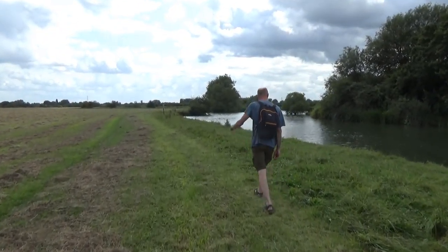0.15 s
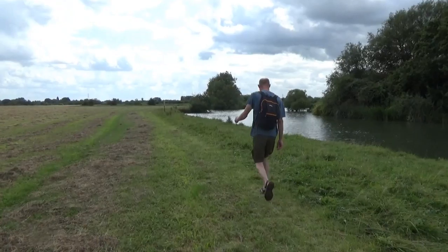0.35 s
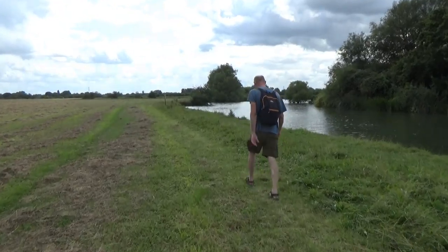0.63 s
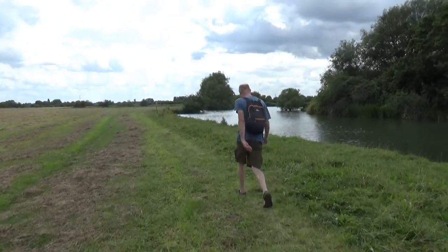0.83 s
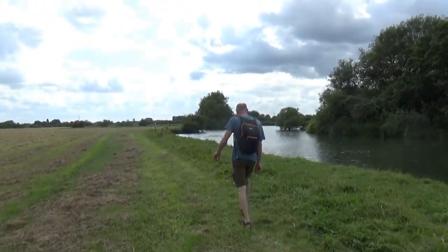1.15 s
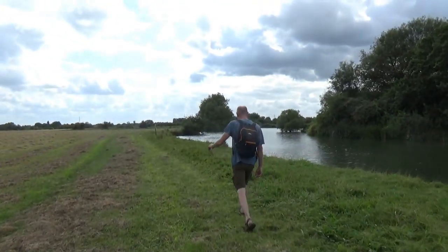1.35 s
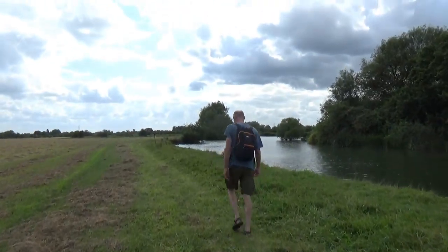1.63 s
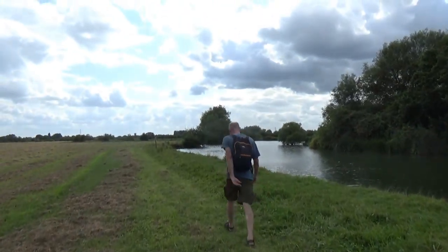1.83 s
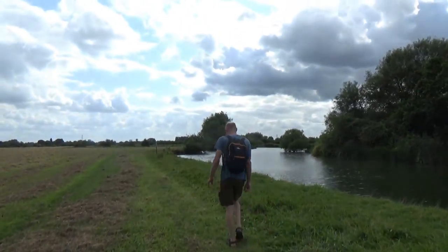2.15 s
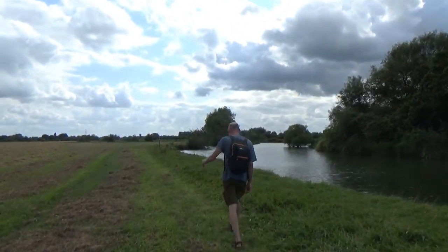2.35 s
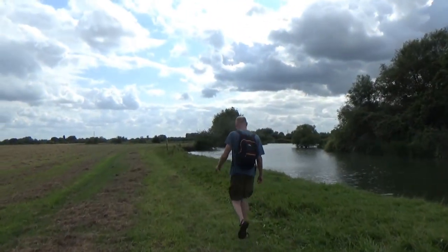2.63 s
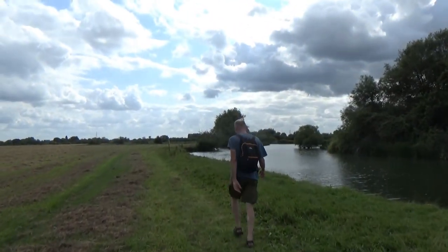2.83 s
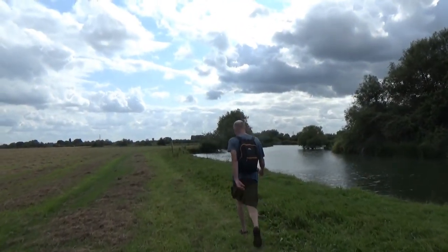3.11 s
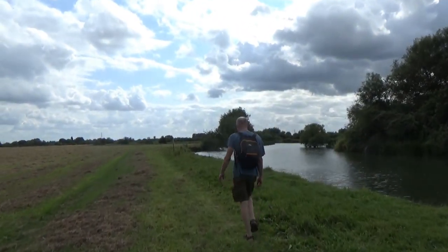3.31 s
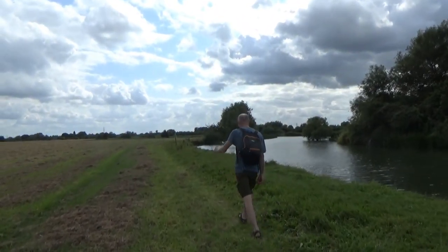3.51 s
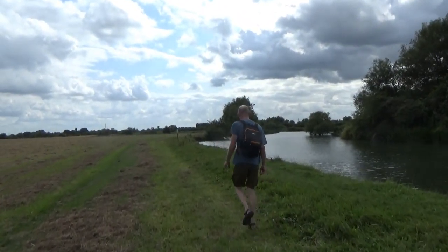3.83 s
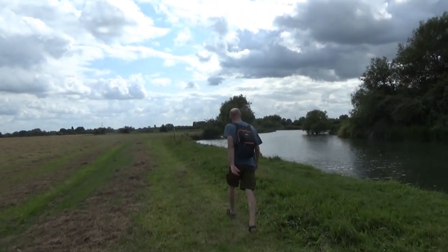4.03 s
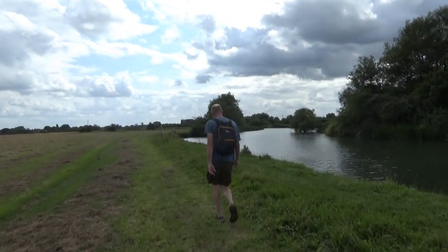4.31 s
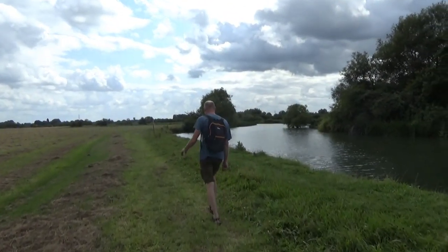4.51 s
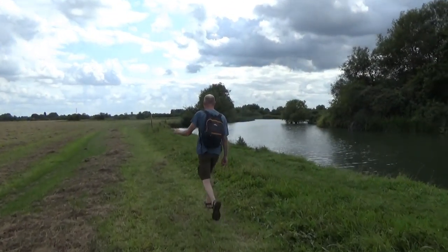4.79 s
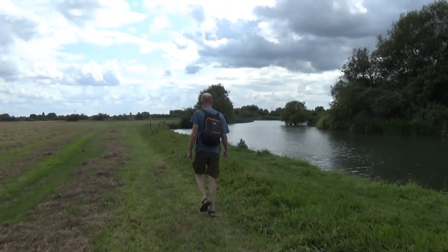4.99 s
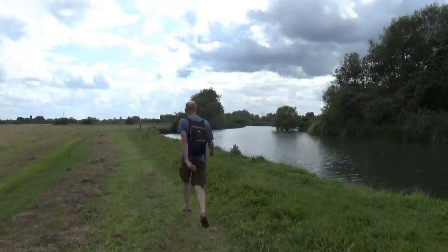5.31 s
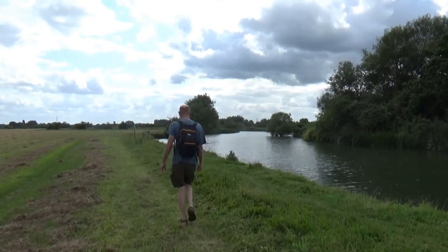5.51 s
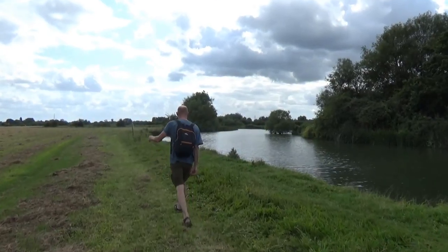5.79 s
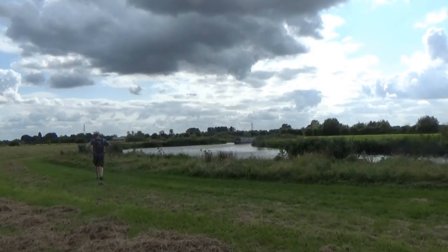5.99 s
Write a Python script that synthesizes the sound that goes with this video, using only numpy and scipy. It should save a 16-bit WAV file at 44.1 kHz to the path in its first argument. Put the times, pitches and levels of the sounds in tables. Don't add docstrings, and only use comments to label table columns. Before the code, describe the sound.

Bright, dry grass rustle dominates, strongest at the start, then rising and falling with each stride. Dull turf crunches, low heel thuds and tiny high clicks mark the steps. Outdoors, no echo, carried stereo microphone, quiet wide hiss and slight low wind. One tiny distant bird note comes midway, a plastic tap late, then a very short silence and a sudden low wind gust.

```python
import sys
import numpy as np
from scipy import signal
from scipy.fft import rfft, irfft
from scipy.io import wavfile
from scipy.ndimage import uniform_filter1d

SR = 44100
rng = np.random.default_rng(int(sys.argv[2]) if len(sys.argv) > 2 else 0)


def invert_db(x):
    u = np.asarray(x, float) / 20
    return 10 ** u


def bounce(signal):
    frames = np.transpose(np.atleast_2d(signal))
    limited = np.clip(frames, -1, 1)
    pcm = np.round(limited * 32767).astype(np.int16)
    wavfile.write(sys.argv[1], SR, pcm)


N = 271215

# [peak_s, level_db, rise_10db_ms, fall_10db_ms]
LEG_SWEEPS = [(0.026, -35, 124, 56), (0.22, -44.5, 215.0, 24), (0.314, -32.5, 34, 216.0),
              (0.448, -30.5, 125, 52), (0.694, -44, 125.0, 205.0), (1.051, -38.5, 317, 66),
              (1.334, -43, 5, 233.0), (1.463, -38.5, 144.0, 266.0), (1.914, -37, 18, 196.0),
              (2.051, -31.5, 76, 115), (2.392, -42, 117.0, 21), (2.447, -39, 17, 189.0),
              (2.728, -41, 182, 137), (2.934, -44.5, 143.0, 217), (3.435, -41.5, 36, 52.0),
              (3.679, -40.5, 152.0, 105.0), (4.0, -45.5, 100.0, 16.0), (4.33, -39, 334, 120),
              (4.436, -42, 107, 101.0), (4.704, -41, 123.0, 57.0), (4.815, -36.5, 88.0, 211),
              (5.157, -44.5, 16.0, 200.0), (5.233, -39, 3, 43.0), (5.266, -36.5, 43, 181),
              (5.483, -34, 66.0, 69), (5.802, -37, 11, 164), (5.922, -33, 121, 47),
              (6.149, -38.5, 79.5, 50.0)]
# [peak_s, level_db, fall_10db_ms]
TUFT_FLICKS = [(0.811, -34, 20), (0.834, -33, 20), (1.08, -32.5, 28), (1.222, -41, 101), (1.619, -36, 81),
               (1.813, -41, 42), (2.6, -37, 44), (2.738, -39.1, 26), (3.127, -34.6, 92), (3.283, -36.5, 74),
               (3.538, -46.5, 27.0), (3.713, -39, 48), (3.811, -38.5, 65), (4.361, -35, 25),
               (4.769, -28, 25), (5.256, -32.5, 12), (5.572, -39, 19), (5.651, -44, 74.0),
               (6.089, -39.5, 21)]
# [freq_hz, density_db]
BLADE_SPECTRUM = [(600, -34), (1000, -8), (1800, -4), (3500, -8), (5400, -7), (7300, -4), (9500, 1.5),
                  (11000, -2.5), (13000, -9.5), (15900, -18)]


def grass():
    snap = 0.11 * grains(rate=2300, spread_db=5.5, patch_rate=280, patchy_db=-4.0)
    flicks = [(s, db, fall, fall) for s, db, fall in TUFT_FLICKS]
    swish_db = swells(-54, LEG_SWEEPS + flicks)
    effort_db = np.maximum(swish_db + 37.5, -16)
    # (centre Hz, dB per dB of effort)
    blade_sizes = ((900, 0.02), (1800, -0.23), (3600, 0.011), (5500, -0.16),
                   (8000, 0.22), (11000, 0.25), (15000, 0.26))
    out = np.zeros(N)
    for hz, brisk in blade_sizes:
        rustle = grains(rate=12000, spread_db=1.5, patch_rate=150, patchy_db=3.0)
        out += invert_db(brisk * effort_db) * band(rustle + snap, hz / 1.32, hz * 1.53)
    return pair(invert_db(swish_db + 0.98) * colour(out, BLADE_SPECTRUM))


# [start_s, peak_db]
BLADE_SNAPS = [(0.0076, -19), (0.081, -27), (0.2235, -28), (0.5225, -27), (0.5535, -28), (4.7495, -18),
               (2.7388, -12), (4.1337, -17), (0.1143, -24), (0.301, -13), (0.4046, -17), (0.426, -19),
               (0.477, -21), (0.5885, -29), (0.6392, -27), (0.803, -23), (0.8345, -21), (1.1488, -27),
               (1.3211, -30), (1.5841, -22), (1.7122, -25), (2.0061, -19), (2.051, -10), (2.1196, -20),
               (2.556, -24), (2.618, -22), (2.8134, -29), (2.9971, -27), (3.0267, -25), (3.0434, -27),
               (3.059, -27), (3.203, -23), (3.6153, -27), (3.628, -27), (3.681, -26), (4.2605, -24),
               (4.297, -26), (4.424, -19), (4.4533, -26), (4.4726, -29), (4.5001, -29), (4.6751, -24),
               (4.7278, -23), (4.7845, -15), (5.012, -28), (5.027, -28), (5.0556, -28), (5.262, -10),
               (5.2845, -22), (5.301, -18), (5.6807, -30), (5.8025, -22), (5.819, -21)]
# [freq_hz, density_db]
SNAP_SPECTRUM = [(1500, -14), (5000, -10), (7500, -3), (10000, 6), (13000, -7), (15900, -10)]


def blade_snaps():
    s, db = np.transpose(BLADE_SNAPS)
    impulse = 1.0 * (np.arange(N) == 0)
    click = colour(impulse, SNAP_SPECTRUM)[:256]
    out = np.zeros(N)
    out[(s * SR).astype(int)] = invert_db(db) * rng.choice([-1, 1], len(s))
    return pair(np.convolve(out, click / np.abs(click).max())[:N])


# [peak_s, level_db, fall_10db_ms]
SOLE_PRESSES = [(-0.001, -43, 167), (0.227, -46, 21.0), (0.294, -43, 148), (0.438, -39.5, 107.0),
                (0.696, -43.5, 103), (0.802, -42.5, 38.0), (0.881, -52.5, 318), (1.084, -39, 57),
                (1.276, -45, 171.0), (1.482, -50, 96.0), (1.619, -47, 119.0), (1.828, -46, 210.0),
                (2.064, -49, 361), (2.253, -48.5, 244.0), (2.45, -51, 114), (2.585, -46.5, 84),
                (2.744, -46, 73), (2.92, -46.5, 134), (3.124, -50, 58.0), (3.272, -43, 45.0),
                (3.351, -46.5, 242.0), (3.707, -45, 24), (3.811, -47.5, 269.0), (4.046, -45.5, 68.5),
                (4.345, -47, 217.0), (4.618, -54, 287.0), (4.8, -45.8, 181), (5.373, -47.5, 240.0),
                (5.502, -51.5, 393), (5.914, -43, 146)]
# [freq_hz, density_db]
TURF_SPECTRUM = [(100, -14.5), (200, 0), (400, 2), (900, 0.5), (2000, -9.5), (4000, -12.5)]


def turf():
    crush = colour(grains(rate=2500, spread_db=2.0, patch_rate=70, patchy_db=1.66), TURF_SPECTRUM)
    tread_db = swells(-50, [(s, db, 0.5 * fall, fall) for s, db, fall in SOLE_PRESSES])
    return pair(invert_db(tread_db + 0.64) * crush)


# [start_s, peak_db, pitch_hz, ring_s]
STALK_BREAKS = [(0.3022, -22, 9920.0, 0.0022), (0.5397, -23, 9280.0, 0.0012), (1.078, -14, 9600, 0.002),
                (2.1316, -12, 8800, 0.0014), (2.521, -23, 10490.0, 0.0019), (2.5975, -19, 7040, 0.0015),
                (2.7391, -8, 9300, 0.001), (3.6673, -20, 10610.0, 0.0014), (4.0931, -21, 9150, 0.0017),
                (4.1097, -23, 8810.0, 0.0015), (4.1338, -12, 11100, 0.00098), (4.1734, -21, 9200, 0.0023),
                (4.3522, -18, 9320.0, 0.0038), (4.359, -21, 9090.0, 0.0031), (4.3653, -14, 9700, 0.0016),
                (4.3738, -19, 9520.0, 0.0039), (4.6975, -17.5, 9760.0, 0.00099),
                (4.702, -22.0, 10750.0, 0.0014), (4.7092, -25, 9680.0, 0.009), (4.7495, -17, 9500, 0.002),
                (4.764, -14.0, 9800, 0.0018), (5.2295, -13.5, 10200, 0.013), (5.255, -15, 8700, 0.0049),
                (5.259, -13.5, 7700, 0.012), (5.3388, -19, 8710.0, 0.0009), (5.352, -25, 8630.0, 0.0051),
                (5.5145, -21, 10400, 0.013), (5.867, -8.5, 9500, 0.0012), (5.9085, -16, 10420.0, 0.004),
                (5.916, -15, 9500, 0.002), (5.922, -12.5, 8900, 0.002)]


def stalks():
    out = np.zeros((2, N))
    for s, db, hz, ring_s in STALK_BREAKS:
        ring_s = max(1.4 * ring_s - 0.0007, 0.0004)
        add_ring(out, s, db - 0.5, hz, ring_s, 0, 1024, rough=0.98, wide=1.18, rise=10)
    return out


# [start_s, peak_db, pitch_hz, ring_s, left_minus_right_db]
STEM_TICKS = [(0.0009, -25.5, 3050, 0.0092, -2), (0.0762, -27, 3090.0, 0.008, 11),
              (0.1702, -27, 2700, 0.0032, 1), (0.2242, -32, 1810.0, 0.0051, 4),
              (0.3005, -22.5, 3000, 0.0033, -1), (0.6305, -24.5, 3000, 0.009, 9),
              (0.755, -29, 2430.0, 0.0089, -0.5), (0.7873, -18.5, 2560.0, 0.0017, -3),
              (0.914, -28, 2200, 0.0042, 0), (1.6, -27, 3300.0, 0.0024, 0.0),
              (1.886, -18.5, 2500, 0.0019, -2), (2.198, -28, 2720, 0.0041, 0),
              (2.617, -23.5, 3310.0, 0.017, -1), (2.9433, -28, 1770, 0.0055, -0.7),
              (3.608, -32.0, 3070.0, 0.0025, 0.1), (4.04, -32, 2100, 0.0033, -5),
              (4.0573, -27, 2360, 0.0037, -1.2), (4.0926, -28, 2630.0, 0.01, 0),
              (4.9158, -30, 2100.0, 0.003, 2), (5.2022, -18.5, 1990, 0.0037, -0.5),
              (5.344, -25, 3110.0, 0.018, 7), (5.4627, -23, 3840, 0.013, -8),
              (5.86, -23.5, 3070, 0.0071, 2), (5.923, -18.5, 3120, 0.006, -9)]


def stems():
    out = np.zeros((2, N))
    for s, db, hz, ring_s, pan_db in STEM_TICKS:
        add_ring(out, s, db - 2.0, hz, 1.1 * ring_s, pan_db, 1024, rough=0.69, wide=2.0, rise=41)
    return out


# [start_s, peak_db, pitch_hz, ring_s]
SOLE_KNOCKS = [(0.0015, -20.5, 1030, 0.012), (0.0399, -28.5, 470.0, 0.01), (0.1148, -32.5, 660, 0.022),
               (0.2245, -23, 806, 0.0059), (0.291, -28, 700, 0.009), (0.806, -30, 530.0, 0.009),
               (1.0129, -23.5, 990, 0.0024), (1.0867, -29, 570.0, 0.0094), (1.2958, -28, 650.0, 0.0072),
               (1.7277, -33, 750, 0.023), (1.817, -33, 720, 0.022), (2.1251, -32, 660, 0.015),
               (2.1445, -28, 503, 0.0092), (2.3317, -36, 706, 0.0076), (2.375, -31, 547, 0.023),
               (2.5249, -33.5, 640.0, 0.013), (2.5947, -32, 420, 0.02), (2.7392, -26, 700.0, 0.0089),
               (2.9619, -27, 920, 0.0061), (3.3579, -22.5, 497, 0.0096), (4.391, -26, 620, 0.013),
               (4.4227, -37, 686, 0.013), (4.5947, -33.5, 720, 0.029), (4.668, -28, 820.0, 0.0053),
               (4.8035, -31, 670.0, 0.0051), (5.024, -31.5, 715, 0.022), (5.1216, -29, 410.0, 0.0112),
               (5.433, -34.5, 460.0, 0.0051), (5.679, -31, 660.0, 0.0064), (5.86, -31, 910.0, 0.012)]
# [start_s, peak_db, pitch_hz, ring_s]
HEEL_THUDS = [
    (0.8, -40, 237, 0.038),
    (1.076, -31.5, 232, 0.044),
    (1.787, -38, 227, 0.037),
    (2.26, -33, 235, 0.023),
    (2.569, -38, 350, 0.024),
    (2.739, -38, 283, 0.026),
    (3.353, -46, 342, 0.027),
    (5.118, -42, 367, 0.021),
    (5.371, -43, 253, 0.032),
]


def shoes():
    out = np.zeros((2, N))
    for s, db, hz, ring_s in SOLE_KNOCKS + HEEL_THUDS:
        add_ring(out, s, db - 0.5, hz, ring_s, 0, 2048, rough=0.46, wide=1.86, rise=75)
    return out


# [start_s, peak_db, pitch_hz, ring_s]
CLOD_BREAKS = [(0.0348, -33, 2200, .004), (0.2425, -32, 900, 0.0072), (0.355, -33, 900, 0.0054),
               (0.392, -28, 1500, .005), (0.513, -37, 700, 0.009), (1.482, -35, 328, 0.021),
               (2.436, -38, 1700, .004), (2.57, -38, 450, .015), (2.926, -35, 700, .01),
               (3.123, -31.5, 1800, .006), (3.2655, -30, 900, .006), (3.282, -33, 750, .01),
               (3.452, -35, 850, .008), (3.6748, -35, 960, 0.0074), (3.682, -31, 3500, .004),
               (3.7675, -37, 420, .015), (3.788, -34, 750, 0.011), (4.4805, -34, 600, .012),
               (4.889, -32, 2000, .004), (5.51, -32, 460, .012), (0.224, -30, 1450, .004),
               (0.301, -23, 5000, .002), (0.301, -27, 1700, .004), (2.379, -33, 1100, .008),
               (2.7388, -30, 1500, .004), (2.7455, -34, 330, .015), (2.9613, -31, 1700, .003),
               (0.279, -31, 600, .01)]


def clods():
    out = np.zeros((2, N))
    for s, db, hz, ring_s in CLOD_BREAKS:
        add_ring(out, s, db, hz, ring_s, 0, 2048, rough=0.5, wide=2.0, rise=60)
    return out


# [pitch_hz, level_db, ring_s]
BODY_MODES = [(700, -5, 0.03), (930, 3.5, 0.043), (1170, 0, 0.025), (1840, 2.5, 0.029), (2300, 0, 0.026),
              (3130, -3, 0.012), (4380, -8, .019), (6140, -9, 0.0063)]
# [start_s, level_db]
BUCKLE_HITS = [
    (5.3751, -27.5),
    (5.3756, -24),
    (5.3764, -28),
    (5.3793, -30),
    (5.3809, -34.5),
]


def strap():
    out, t = np.zeros((2, N)), np.arange(2048) / SR
    for s, hit_db in BUCKLE_HITS:
        i = int(s * SR)
        spots = rng.uniform(-1.25, 1, (len(BODY_MODES), 2))
        for (hz, db, ring_s), (side, spot) in zip(BODY_MODES, spots):
            tone = np.sign(spot) * np.sin(2 * np.pi * hz * (1 + 0.025 * spot) * t)
            tone *= np.exp(-np.log(1000) * t / (0.4 * ring_s))
            out[:, i:i + len(t)] += pair(invert_db(hit_db + db) * tone, 10.0 * side)
        add_ring(out, s, hit_db + 2.0, 1900, 0.014, -4.0, 1024, rough=1.0, wide=3.0, rise=40)
    return out


# [peak_s, level_db, fall_10db_ms]
WIND_PUFFS = [(0.26, -59, 200), (0.46, -42, 38), (1.07, -53, 150), (1.35, -57, 120), (1.7, -57, 100),
              (2.26, -54, 100), (2.84, -58, 150), (3.2, -52, 40), (3.64, -47, 70), (4.24, -50, 122),
              (4.45, -46, 129), (4.71, -43.5, 60), (4.93, -48.5, 150), (5.36, -45, 125), (5.6, -45, 120)]
# [freq_hz, density_db]
PORT_SPECTRUM = [(20, -11), (45, -3), (80, -4), (130, -9), (250, -19.5), (500, -40.5)]


def breeze():
    middle = colour(rng.standard_normal(N), PORT_SPECTRUM)
    beside = colour(rng.standard_normal(N), PORT_SPECTRUM)
    puff_db = swells(-55, [(s, db, fall, fall) for s, db, fall in WIND_PUFFS])
    return invert_db(puff_db - 1.64) * (middle + 0.11 * beside * np.array([[1], [-1]]))


# [time_s, level_db]
STRONG_WIND = [
    (6.03, -17),
    (6.15, -26),
]
# [freq_hz, density_db]
BUFFET_SPECTRUM = [(20, -9), (65, -5.5), (140, -5.5), (390, -20), (600, -31), (1500, -33)]
# [start_s, peak_db, pitch_hz, ring_s, left_minus_right_db]
EDDY_THUMPS = [
    (6.0243, -11, 152, 0.021, 4),
    (6.0472, -13, 159, 0.019, 6.5),
    (6.0523, -20.5, 147, 0.037, -1),
    (6.0725, -34, 110.0, 0.034, 2),
    (6.083, -20, 120.0, 0.089, -3),
    (6.0947, -15, 118, 0.026, 4),
    (6.1083, -14, 109, 0.019, -4),
    (6.13, -36, 160.0, 0.045, 7),
    (6.1423, -16, 144, 0.036, 5),
]


def buffeting():
    middle = colour(rng.standard_normal(N), BUFFET_SPECTRUM)
    side = band(colour(rng.standard_normal(N), BUFFET_SPECTRUM), 140, 500)
    out = invert_db(curve(STRONG_WIND) - 7.0) * (0.52 * middle + 0.86 * side * np.array([[-1], [1]]))
    for s, db, hz, ring_s, pan_db in EDDY_THUMPS:
        add_ring(out, s, db - 5.5, hz, ring_s, pan_db, 4096, rough=0.3, wide=1.8, rise=33)
    return out


def wind():
    second_spot = np.arange(N) > 5.98 * SR
    return np.where(second_spot, buffeting(), breeze())


# [start_s, length_s, from_hz, to_hz, level_db]
BIRD_NOTE = (3.418, .024, 6000, 5650, -45)


def bird():
    s, length_s, from_hz, to_hz, db = BIRD_NOTE
    t = np.arange(int(length_s * SR)) / SR
    i = int(s * SR)
    out = np.zeros(N)
    out[i:i + len(t)] = invert_db(db) * np.hanning(len(t)) * signal.chirp(t, from_hz, length_s, to_hz)
    return pair(out)


# [freq_hz, density_db]
FIELD_SPECTRUM = [(60, -29), (150, -5.5), (400, -1), (850, 5.5), (1400, 1), (2500, -6), (5000, -11.5),
                  (9000, -9.5), (15900, -25)]


def fields():
    def one_side():
        level_db = -54 + 0.8 * walk(6.3)
        return invert_db(level_db) * colour(rng.standard_normal(N), FIELD_SPECTRUM)
    return np.array([one_side(), one_side()])


def curve(table):
    s, value = np.transpose(table)
    return np.interp(np.arange(N) / SR, s, value)


def swells(rest_db, events):
    ms, power = np.arange(1000 * N / SR + 2), invert_db(2 * rest_db)
    for s, db, rise, fall in events:
        late = ms - 1000 * s
        distance = np.where(late < 0, -late / max(rise, 2), late / max(fall, 2))
        power = power + invert_db(2 * db - 20 * distance)
    return curve(np.transpose([ms / 1000, 10 * np.log10(power)]))


def walk(rate):
    k = int(SR / rate)
    held = np.repeat(rng.standard_normal(N // k + 1), k)
    return 0.92 * uniform_filter1d(uniform_filter1d(held, k), k)[:N]


def grains(rate, spread_db, patch_rate, patchy_db):
    hit = rng.random(N) < rate / SR
    size = np.minimum(rng.exponential(size=N), 3.6)
    return hit * rng.standard_normal(N) * invert_db(spread_db * size + patchy_db * walk(patch_rate))


def colour(x, spectrum):
    hz, db = np.transpose(spectrum)
    grid = np.linspace(1, SR / 2, 4097)
    outside = np.maximum(hz[0] / grid, 1) * np.maximum(grid / hz[-1], 1)
    gain_db = np.interp(np.log(grid), np.log(hz), db) - 30 * np.log2(outside)
    cepstrum = irfft(np.maximum(gain_db, -100) * np.log(10) / 20)
    cepstrum[1:4096] *= 2
    cepstrum[4097:] = 0
    y = signal.fftconvolve(x, irfft(np.exp(rfft(cepstrum))))[:N]
    return y / np.sqrt(np.mean(y ** 2))


def band(x, lo_hz, hi_hz):
    sos = signal.butter(2, [lo_hz, min(hi_hz, 0.45 * SR)], "band", fs=SR, output="sos")
    return signal.sosfilt(sos, x)


def pair(x, pan_db=0.0):
    return np.array([x * invert_db(pan_db / 2), x * invert_db(-pan_db / 2)])


def add_ring(out, s, db, hz, ring_s, pan_db, length, rough, wide, rise):
    t = np.arange(length) / SR
    scratch = band(rng.standard_normal(length), hz / wide, hz * wide)
    share = np.clip(rough * ring_s * hz / 25, 0, 1)
    wave = (1 - share) * np.sin(2 * np.pi * hz * t) + share * scratch / scratch.std()
    wave *= np.exp(-np.log(1000) * t / ring_s)
    wave *= 1 - np.exp(-t * rise / ring_s)
    i = int(s * SR)
    out[:, i:i + length] += pair(invert_db(db) * wave / np.abs(wave).max(), pan_db)[:, :N - i]


def scene():
    walker = grass() + blade_snaps() + turf() + stalks() + stems() + shoes() + clods()
    return walker + strap() + wind() + bird() + fields()


# [time_s, gain]
SPOT_FADE = [
    (0, 1),
    (5.94, 1),
    (5.9605, 0),
    (6.0045, 0),
    (6.026, 1),
    (6.15, 1),
]


def change_spot(x):
    return x * curve(SPOT_FADE) ** 1.3


def top_cut(x):
    return signal.sosfilt(signal.butter(12, 16490, fs=SR, output="sos"), x)


def record(dry):
    low_pass = signal.ellip(10, 0.2, 40, 15780, fs=SR, output="sos")
    mix = signal.sosfilt(low_pass, change_spot(dry))
    return top_cut(mix)


dry = scene()
out = record(dry)
bounce(out)
```